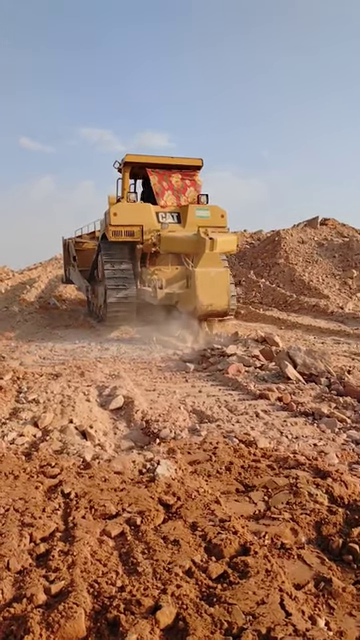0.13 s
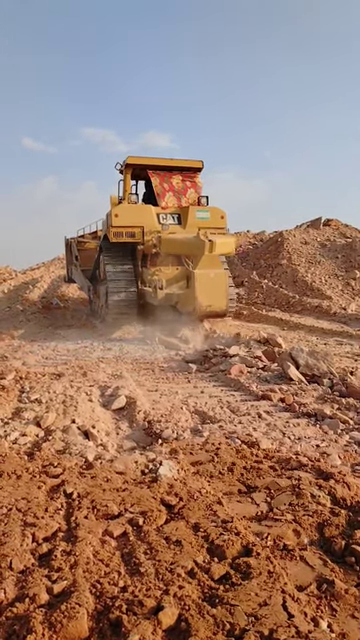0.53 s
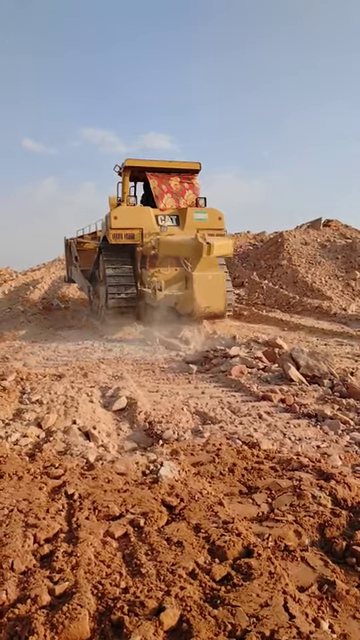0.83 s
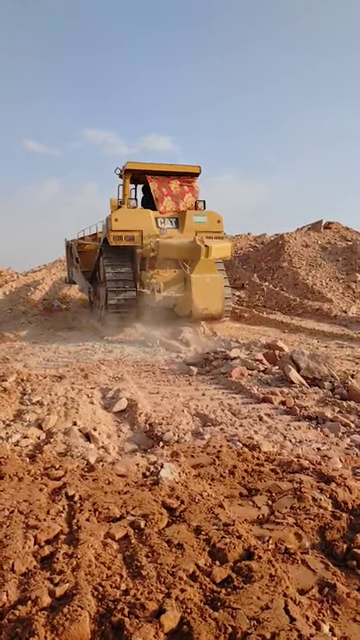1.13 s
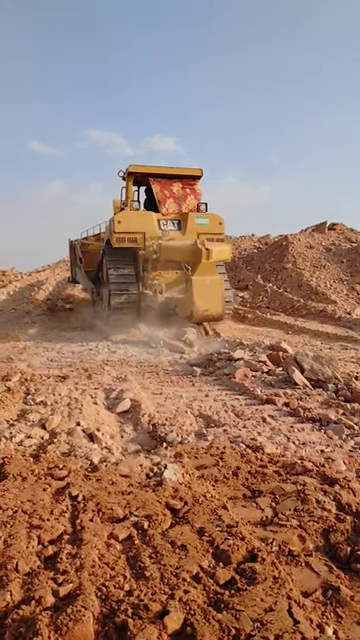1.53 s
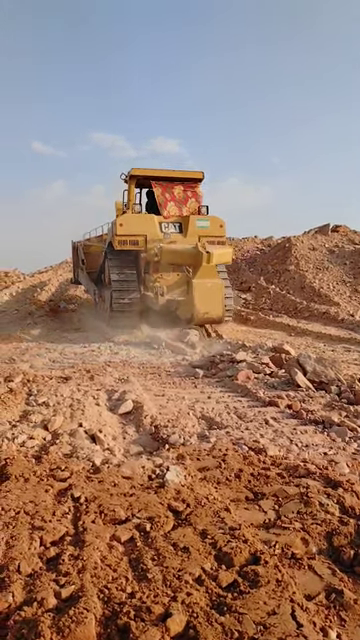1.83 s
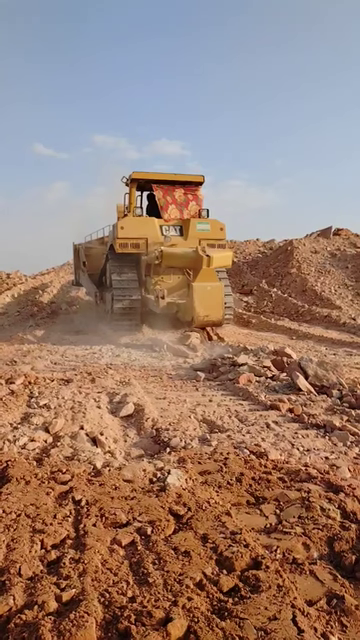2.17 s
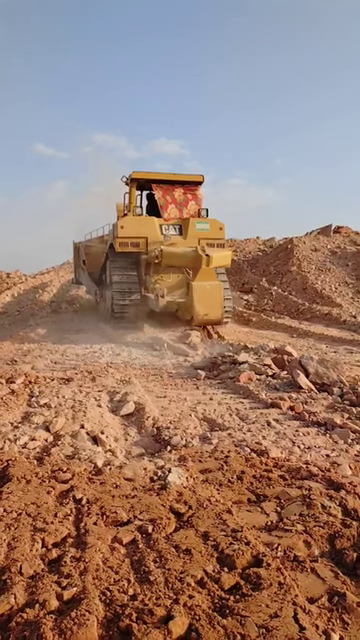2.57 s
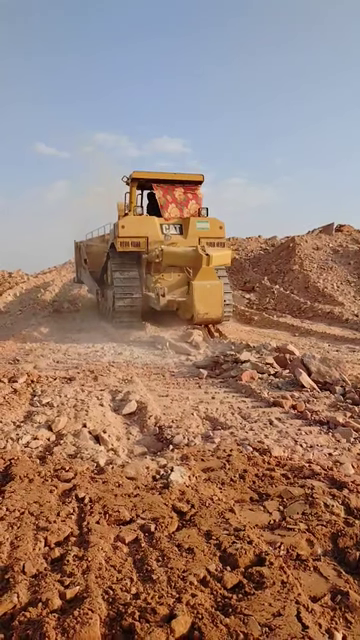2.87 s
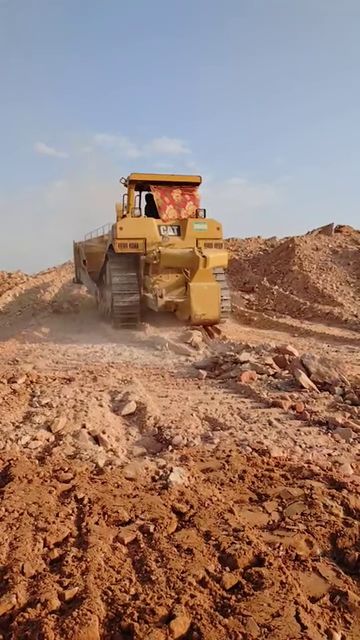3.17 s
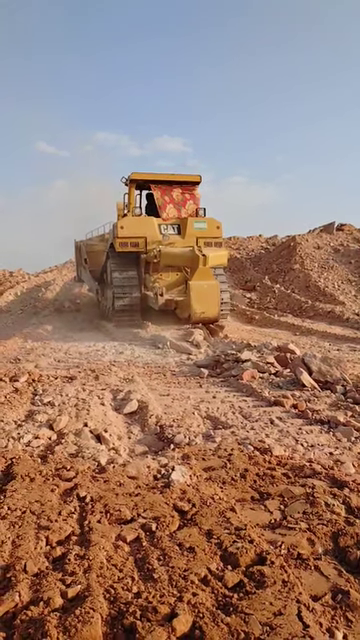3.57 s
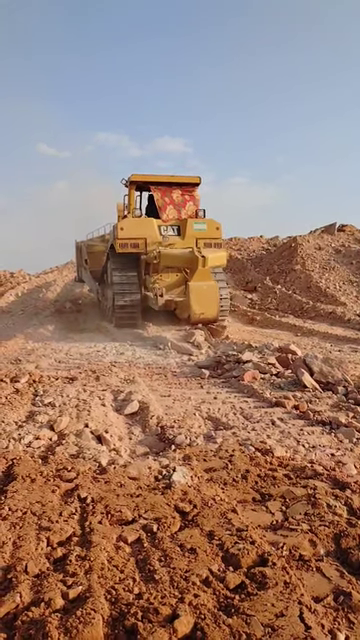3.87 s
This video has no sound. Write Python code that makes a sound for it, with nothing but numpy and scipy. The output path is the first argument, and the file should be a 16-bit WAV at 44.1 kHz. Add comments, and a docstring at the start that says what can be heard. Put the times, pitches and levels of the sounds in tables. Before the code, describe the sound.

A tracked bulldozer squeals, then grinds through rock in loud ringing bursts before falling nearly quiet

```python
"""A diesel drones under a rumbling hull, then dry tracks squeal and steel grinds through rock in ringing bursts.
Gravel spills; in the lull slipping steel creaks, a rock knocks, and a thin squeal leads into the next stroke
of a bulldozer. Clumped random fractures make grinding, rumble, gravel and creak; wavering sines make ring,
squeals and diesel. Open ground, heard by two closely spaced microphones from a little to the right."""
import sys
import numpy as np
from scipy import signal
from scipy.fft import rfft, irfft, next_fast_len
from scipy.io import wavfile

SR = 44100
rng = np.random.default_rng(int(sys.argv[2]) if len(sys.argv) > 2 else 0)


def inscribe(sig):
    """Save sig as 16-bit PCM at rate SR to the path in sys.argv[1].

    A 1-D sig is mono; a 2-D sig holds one channel per row.
    Samples are clipped to [-1, 1] before scaling.
    """
    pcm = np.round(np.clip(np.atleast_2d(sig).T, -1, 1) * 32767)
    wavfile.write(sys.argv[1], SR, pcm.astype(np.int16))


N = 176400
TIME = np.arange(N) / SR  # seconds

# Levels marked relative are trimmed or normalised where they are used.
# Steel biting into rock; rise and fall cover 30 dB:
# full_s, until_s, rise_s, fall_s, relative crunch_db, body_db, judder_db
BITES = [(0.552, 0.579, 0.098, 0.044, -30.5, -18, -22), (0.593, 0.753, .015, 0.48, -24.5, -17, -42.5),
         (0.864, 0.869, .15, .3, -33.5, -21.5, -26), (1.035, 1.287, 0.0085, 0.16, -22.5, -18, -38),
         (1.455, 1.467, 0.11, 0.16, -45, -32.5, -35), (1.651, 1.838, 0.08, 0.075, -23.5, -18.5, -29.5),
         (2.242, 2.263, 0.064, 0.05, -31.5, -24, -28.5), (2.291, 2.368, 0.078, 0.13, -21.5, -18, -25),
         (3.985, 4.01, 0.048, .1, -35, -34, -41.5)]
# Spectrum of crumbling stone: frequency_hz, relative level_db
CRUNCH_COLOUR = [(820, -34.5), (1400, -6.5), (1590, -3.5), (2120, -4), (2440, -2.5), (3810, -7.5),
                 (4790, -17.5), (5790, -10.5), (6330, -20), (7870, -11), (8950, -23.5), (9790, -36),
                 (15000, -33)]
# Resonances of the steel: centre_hz, width_hz, relative level_db
STEEL_MODES = [(488.4, 48, -10.5), (658.4, 22.8, 0.5), (805.4, 47, -3), (884, 62, 1), (989, 50, 3.5),
               (1050, 64, 1), (1155, 55, 4), (1186, 54, 2), (1262, 41, -3), (1548, 39, -8), (1770, 47, -13)]
# Spectrum of the shaken frame: frequency_hz, relative level_db
JUDDER_COLOUR = [(70, -24), (150, 0), (220, -0.5), (310, -4), (480, 3), (620, 0), (900, -12.5), (2000, -55)]
# Swells of the ringing steel; rise covers 30 dB: peak_s, rise_s, level_db
RING_SWELLS = [(.63, 0.25, -19), (.73, 0.096, -18), (0.951, 0.14, -20.5), (1.081, 0.085, -15.5),
               (1.19, 0.17, -14), (1.274, 0.47, -14.5), (1.851, 0.14, -16), (2.381, 0.16, -14)]
RING_HZ = 870.5

# Short track squeals: start_s, length_s, pitch_hz, glide_hz, relative level_db,
# second_partial_db and third_partial_db against the first, roughness (0-1)
SQUEALS = [(0.131, 0.2, 2342, -2.5, -23.5, -10, -12, 0.09), (.138, 0.12, 4010, -24, -26.5, -17, -31, .38),
           (0.154, 0.18, 4640, 0.5, -28, -8, -18, 0.25), (0.315, 0.19, 2270, -23, -31, -14, -22, 0.36),
           (0.335, 0.19, 3875, -7.5, -26, -31, -34, .32), (0.364, 0.178, 3980, 13, -31, -11, -13.5, .26),
           (0.428, 0.085, 4468, 2, -25.5, -15, -26, 0.02), (0.436, 0.12, 8000, -2, -31, -50, -50, 0.09),
           (0.423, 0.096, 5200, -6, -36.5, -16, -35, .25),
           (1.971, 0.057, 4450, 85.5, -44, -13.5, -21, 0.92), (2.093, 0.051, 4670, 68, -46.5, 0, -21, 0.49),
           (2.717, 0.183, 1348, -15, -52, -11, -40, 0.22), (3.34, 0.13, 3990, -16, -54.5, -15.5, -32, 0.42),
           (3.585, 0.044, 4436, 190, -47.5, -17, -30, .45)]
SQUEAL_RISE_S, SQUEAL_FALL_S = 0.014, 0.055  # the fall covers 60 dB
# The long thin squeal: time_s, pitch_hz, relative level_db
LONG_SQUEAL = [(3.7, 3920, -55), (3.725, 3947, -36), (3.862, 3936, -30), (3.94, 3920, -39.5),
               (3.98, 3940, -24), (4, 3950, -25.5)]
# Rasps of slipping steel; rise and fall cover 30 dB: full_s, until_s, rise_s, fall_s, level_db
RASPS = [(0.151, 0.24, 0.049, 0.17, -25.5), (0.356, 0.433, .02, 0.12, -30),
         (0.442, 0.502, 0.15, 0.041, -27), (3.54, 3.634, .05, 0.1, -49)]
# Spectrum of the rasps: frequency_hz, relative level_db
RASP_COLOUR = [(1200, -32.5), (2200, 3), (2900, -4), (4000, 4.5), (6800, -2.5), (8500, -14), (10200, -26),
               (12200, -12), (15000, -21.5)]

# Travel noise: time_s, relative hull_rumble_db, relative rolling_tracks_db
TRAVEL = [(0, -40, -30), (.12, -23, -30), (.2, -35.5, -32), (.95, -28, -36.5), (1.45, -31, -37),
          (2.0, -45, -49), (2.3, -39.5, -45), (2.6, -44, -50.5), (3.05, -52, -50), (4, -47.5, -49.5)]
# Lurches of the hull; rise and fall cover 30 dB: peak_s, rise_s, fall_s, relative level_db
LURCHES = [(.08, 0.43, .25, -23.5), (0.571, 0.15, 0.21, -21), (1.001, 0.25, 0.27, -20),
           (1.649, .25, 0.28, -21), (1.8, 0.22, 0.156, -26), (2.31, .2, 0.38, -24),
           (3.149, 0.072, 0.28, -25), (4, 0.056, .1, -25.5)]
# Spectrum of the hull rumble: frequency_hz, relative level_db
RUMBLE_COLOUR = [(20, -53), (48, -39.5), (72, -6), (115, 1), (150, -0.5), (200, -7), (300, -27),
                 (600, -36.5), (2000, -83.5)]
# Spectrum of the rolling tracks: frequency_hz, relative level_db
ROLL_COLOUR = [(100, -10), (240, 3.5), (340, -0.5), (480, 2), (620, -1), (950, 2.5), (1230, -7),
               (1420, -12), (3000, -19), (5000, -24.5), (8300, -29), (9800, -45.5), (15000, -48.5)]

# Diesel: time_s, mean firing_rate_hz, relative level_db
ENGINE = [(0, 77.7, -23), (0.15, 78.2, -34.5), (0.3, 78.36, -38.5), (0.58, 79.5, -29), (0.78, 75, -38),
          (0.98, 72.8, -29.5), (1.15, 76.5, -27.5), (1.32, 73, -25), (1.5, 69.24, -39.5),
          (1.75, 67.4, -28.5), (2.0, 67.5, -45.5), (2.35, 70, -32), (2.6, 67, -78), (3.0, 67, -80),
          (3.3, 68, -48), (4, 66.6, -50)]
# Diesel harmonics: multiple of the firing rate, relative level_db
ENGINE_ORDERS = [(1, -16), (1.5, -6.5), (2, -2.5), (2.5, -25), (3, -21)]

# Stones that snap: start_s, level_db, ring_s (time to fall 60 dB)
SNAPS = [(0.35, -22.5, 0.11), (0.595, -28.5, 0.052), (0.75, -18.5, 0.053), (1.033, -20, 0.051),
         (2.326, -14, 0.093), (3.291, -48.5, 0.11)]
# Spills of gravel, and a creak of slipping steel at 3.136 s; rise and fall cover 41 dB:
# peak_s, rise_s, fall_s, level_db
SPILLS_AND_CREAK = [(0.05, 0.83, .5, -41), (0.92, 0.19, 0.29, -35.5), (1.481, 0.99, 0.31, -40.5),
                    (2.08, 0.31, .2, -52), (2.19, 0.089, .1, -42), (3.136, 0.1, 0.14, -35),
                    (3.6, 0.19, 0.19, -59), (3.84, 0.11, 0.11, -54.5)]
# Spectrum of the gravel and of the creak, which peaks near 3 kHz: frequency_hz, relative level_db
GRAVEL_AND_CREAK_COLOUR = [(500, -34), (1400, -10.5), (3000, 6), (4700, -7), (8000, 0.5), (9000, -5),
                           (9800, -26.5), (15000, -20)]
# Hollow modes of the knocked hull: pitch_hz, level_db against the knock, ring_s (time to fall 60 dB)
HULL_MODES = [(318, 2.5, 0.16), (490, -2, 0.12), (564, 2, 0.14)]
KNOCK_S, KNOCK_DB = 3.428, -39.5

# Likeness of left and right: frequency_hz, likeness (0-1)
ALIKE = [(100, 1), (500, 0.9), (900, 0.9), (1250, 0.32), (1600, 0.29), (3000, 0.42), (6000, 0.12),
         (12000, 0.13)]
# Stereo balance: frequency_hz, left_minus_right_db
BALANCE = [(60, -1.5), (200, 1.5), (500, 0), (750, -1), (1000, -1), (1180, 2), (1500, -3), (2000, -1.5),
           (3300, -3), (4300, 0), (7500, 1), (8700, -10), (10000, -0.5)]
LEFT_LAG_S = 0.00015
# Overall treble tone: frequency_hz, gain_db
TREBLE_TONE = [(9200, 2), (9800, -5.5), (12000, -2.5), (15000, -19)]
TOP_HZ = 15600  # nothing sounds above this


def grinding(crunch_db=1.0, body_db=1, judder_db=0, chatter_db=0.85):
    """Stone crumbles under steel: fractures crunch, drive the steel's resonances and shake the frame."""
    power = sum((amp(row[4:])[:, None] * swell(*row[:4])) ** 2 for row in BITES)
    crunch, body, judder = np.sqrt(power)
    stone = spread(fractures(rate=5000, scatter_db=0.5), resonant(CRUNCH_COLOUR, ripple_db=4, count=500))
    metal = spread(fractures(rate=12000, scatter_db=3.5), steel)
    frame = grit(JUDDER_COLOUR, rate=8000, scatter_db=4)
    mix = amp(crunch_db) * crunch * stone
    mix = mix + amp(body_db) * body * metal
    mix = mix + amp(judder_db) * judder * frame
    return amp(chatter_db * wobble(90)) * mix


def steel(hz):
    """Response of the steel: a bank of resonances with alternating sign."""
    response = 0
    for k, (centre, width, db) in enumerate(STEEL_MODES):
        damping = 1j * hz * width
        response = response + (-1) ** k * amp(db) * damping / (centre ** 2 - hz ** 2 + damping)
    return response


def ring(fall_s=.17, drift_hz=2, flutter_db=1):
    """One lightly damped mode of the steel sings as a wavering sine; each swell takes fall_s to drop 30 dB."""
    power = sum((amp(db) * swell(peak, peak, rise, fall_s)) ** 2 for peak, rise, db in RING_SWELLS)
    tone = np.sin(sweep(RING_HZ + drift_hz * wobble(40)))
    return np.sqrt(2) * tone * np.sqrt(power) * amp(flutter_db * wobble(35))


def squeals(level_db=1, long_db=2):
    """Track pins and rollers rasp and squeal in short overlapping notes, later in one long thin one."""
    rasp_level = sum(amp(row[4]) * swell(*row[:4]) for row in RASPS)
    rasp_colour = resonant(RASP_COLOUR, ripple_db=8.5, count=400)
    out = rasp_level * spread(fractures(rate=13000, scatter_db=3.2), rasp_colour)

    for start, length, pitch, glide, db, second_db, third_db, rough in SQUEALS:
        t = TIME - start
        attack = np.clip(t / SQUEAL_RISE_S, 0, 1)
        release = amp(-60 * np.clip((t - length) / SQUEAL_FALL_S, 0, 3))
        hz = pitch + glide * np.clip(t / length, 0, 1)
        level = amp(db + level_db + 1.84 * wobble(30))
        out += level * attack * release * slip(hz, [0, second_db, third_db], rough)

    hz, level = curves(LONG_SQUEAL)
    gate = swell(LONG_SQUEAL[0][0], LONG_SQUEAL[-1][0], .02, .02)
    return out + amp(level + long_db) * gate * slip(hz, [0, -24, -35], rough=0.13)


def slip(hz, partials_db, rough, jitter_hz=130, flutter_db=5):
    """Stick-slip tone of dry steel; roughness shakes its pitch, and its level separately on each side."""
    jitter = jitter_hz * rough * (1 + 1.4 * rough ** 3) * wobble(900)
    phase = sweep(hz + jitter)
    tone = sum(amp(db) * np.sin(k * phase) for k, db in enumerate(partials_db, 1) if k * hz.mean() < TOP_HZ)
    flutter = flutter_db * rough * np.array([wobble(110), wobble(110)])
    return np.sqrt(2) * tone * amp(flutter)


def rolling(rumble_db=-4.0, roll_db=3):
    """The hull rumbles and lurches, and the tracks crush loose ground: two colours of dense fractures."""
    bass, middle = curves(TRAVEL)
    lurch_power = sum((amp(db) * swell(peak, peak, rise, fall)) ** 2 for peak, rise, fall, db in LURCHES)
    hull_level = np.sqrt(amp(bass) ** 2 + lurch_power)
    hull = amp(rumble_db) * hull_level * grit(RUMBLE_COLOUR, rate=5000, scatter_db=.8)
    tracks = amp(middle + roll_db) * grit(ROLL_COLOUR, rate=14000, scatter_db=0.0)
    return hull + tracks


def engine(level_db=-2, uneven_db=3):
    """The diesel labours: low orders of an unsteady firing rate, each wavering in level."""
    hz, level = curves(ENGINE)
    phase = sweep(hz * (1 + 0.009 * wobble(25)))
    tone = 0
    for order, db in ENGINE_ORDERS:
        strength = amp(db + uneven_db * wobble(16))
        tone = tone + strength * np.sin(order * phase + rng.uniform(0, 2 * np.pi))
    return unit(tone) * amp(level + level_db)


def stones_and_creak():
    """Stones snap as decaying noise, fractures make gravel and a steel creak, and a lump knocks hull modes."""
    snaps = sum(amp(db - 60 * np.clip((TIME - s) / t60, 0, 3)) * (TIME >= s) for s, db, t60 in SNAPS)
    snap_noise = spread(rng.standard_normal((2, N)), lambda hz: amp(along(CRUNCH_COLOUR, hz)))
    grit_level = sum(amp(db - 41 * np.maximum((s - TIME) / rise, (TIME - s) / fall))
                     for s, rise, fall, db in SPILLS_AND_CREAK)
    gravel_and_creak = grit_level * grit(GRAVEL_AND_CREAK_COLOUR, rate=8100, scatter_db=3.0)
    t = np.maximum(TIME - KNOCK_S, 0)
    knock = sum(amp(KNOCK_DB + db - 60 * t / t60) * np.sin(2 * np.pi * hz * t) for hz, db, t60 in HULL_MODES)
    return snaps * snap_noise + gravel_and_creak + knock


def grit(points, rate, scatter_db):
    """Dense tiny fractures of uneven size with the given spectrum."""
    return spread(fractures(rate, scatter_db), lambda hz: amp(along(points, hz)))


def fractures(rate, scatter_db):
    """Random impulses at a mean rate per second, shared in time by both sides; scatter makes sizes clump."""
    hits = rng.random(N) < rate / SR
    return hits * amp(scatter_db * wobble(260)) * rng.standard_normal((2, N))


def resonant(points, ripple_db, count):
    """A spectrum broken up by many close random resonances."""
    ripple = rng.standard_normal(count)
    knots_hz = np.linspace(0, SR / 2, count)
    return lambda hz: amp(along(points, hz) + ripple_db * np.interp(hz, knots_hz, ripple))


def spread(pair, colour):
    """Colour two unrelated signals and mix them to left and right by likeness, rms 1."""
    def response(hz):
        turn = np.arccos(np.clip(along(ALIKE, hz), 0, 1)) / 2
        return colour(hz) * np.array([np.cos(turn), np.sin(turn)])

    mid, side = filtered(pair, response)
    return unit(np.array([mid + side, mid - side]))


def swell(full, until, rise, fall):
    """Attack, hold and release; rise and fall are the times for 30 dB."""
    distance = np.maximum((full - TIME) / rise, (TIME - until) / fall)
    return amp(-30 * np.clip(distance, 0, 6))


def sweep(hz):
    """Phase in radians of a moving pitch."""
    return 2 * np.pi * np.cumsum(hz) / SR


def wobble(rate):
    """A smooth random curve of rms 1, about rate knots a second."""
    return unit(signal.resample(rng.standard_normal(int(4 * rate) + 4), N))


def curves(rows):
    """One value per sample for each column after the time."""
    s, *columns = np.transpose(rows)
    return [np.interp(TIME, s, column) for column in columns]


def along(points, hz):
    """Read (frequency_hz, value) points on a log frequency axis."""
    f, v = np.transpose(points)
    return np.interp(np.log(hz + 1), np.log(f + 1), v)


def filtered(x, response):
    """Shape x by a complex response of frequency, with padding for the tail."""
    m = next_fast_len(N + SR // 4)
    return irfft(rfft(x, m) * response(np.fft.rfftfreq(m, 1 / SR)), m)[..., :N]


def amp(db):
    """Decibels to gain."""
    return 10 ** (np.asarray(db) / 20)


def unit(x):
    """Scale to rms 1."""
    return x / np.sqrt(np.mean(x ** 2) + 1e-20)


def scene():
    """All of the machine, reaching the left microphone slightly later."""
    machine = grinding() + ring() + squeals() + rolling() + engine() + stones_and_creak()
    sides = np.array([[.5], [-.5]])  # left, right

    def arrival(hz):
        delay = np.exp(-2j * np.pi * hz * LEFT_LAG_S * sides)
        return amp(sides * along(BALANCE, hz)) * delay

    return filtered(machine, arrival)


def record(dry):
    """The highest peaks are rounded, the extreme treble is dull, and nothing sounds above TOP_HZ."""
    rounded = dry / (1 + np.abs(dry / .8) ** 8) ** (1 / 8)
    return filtered(rounded, lambda hz: amp(along(TREBLE_TONE, hz)) * (hz < TOP_HZ))


dry = scene()
out = record(dry)
inscribe(out)
```